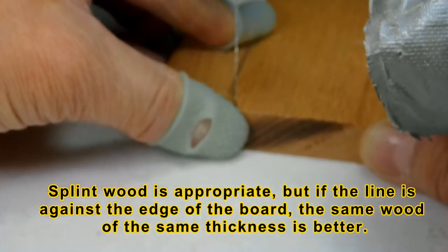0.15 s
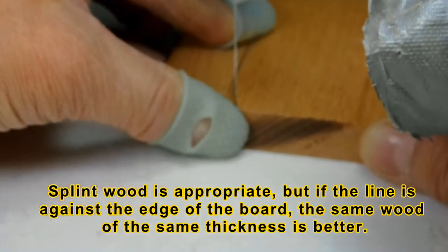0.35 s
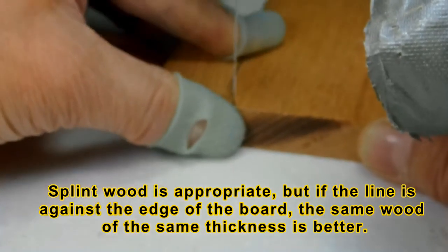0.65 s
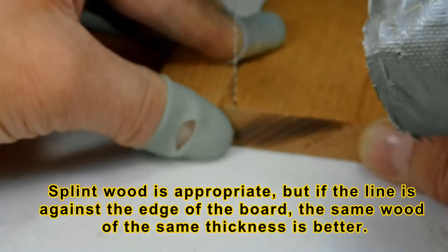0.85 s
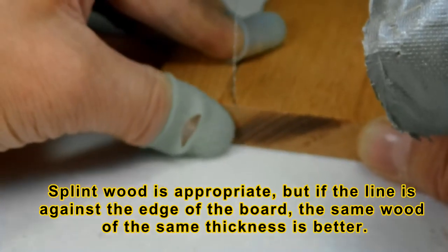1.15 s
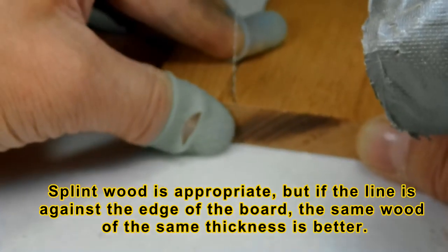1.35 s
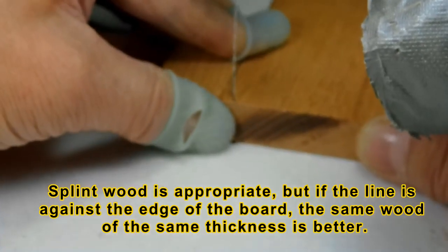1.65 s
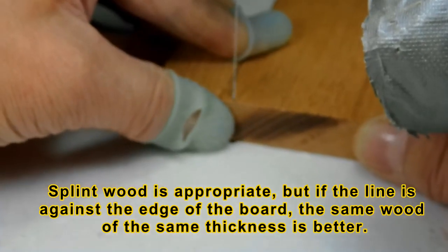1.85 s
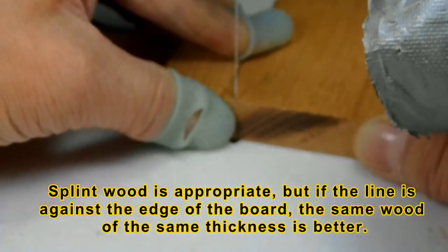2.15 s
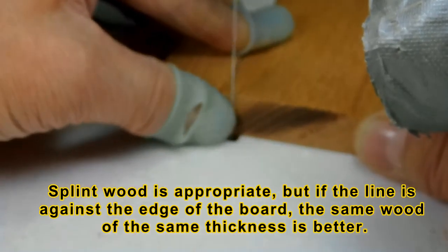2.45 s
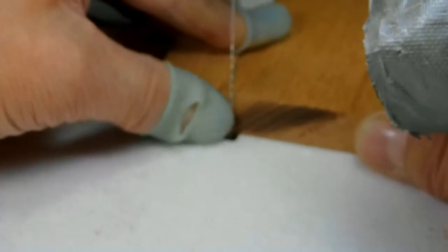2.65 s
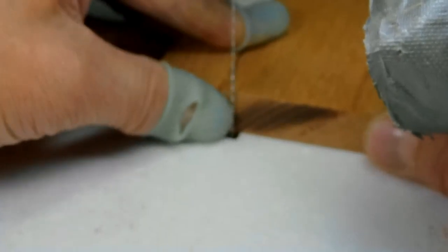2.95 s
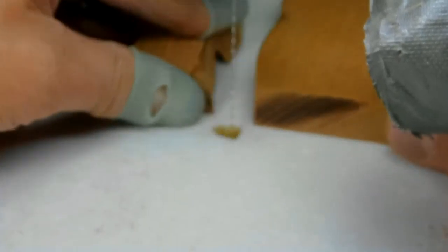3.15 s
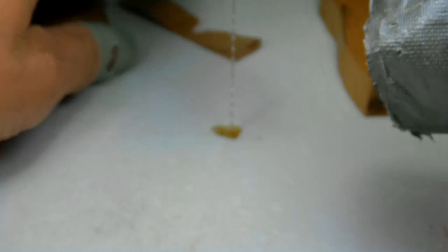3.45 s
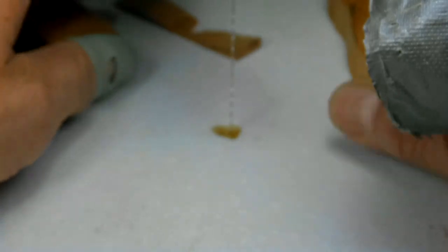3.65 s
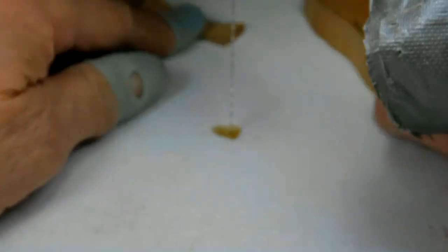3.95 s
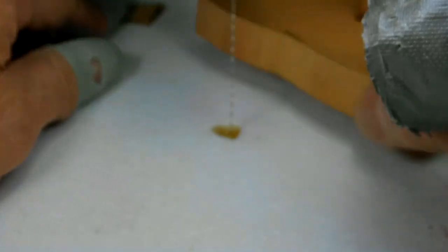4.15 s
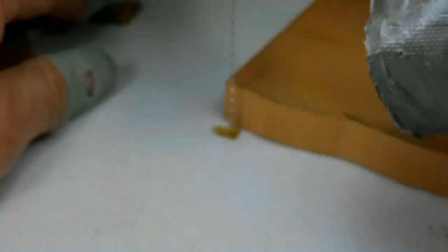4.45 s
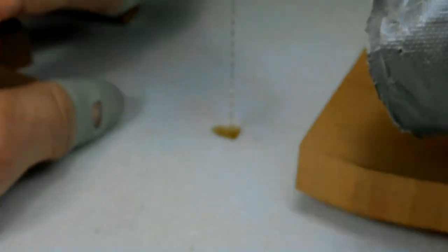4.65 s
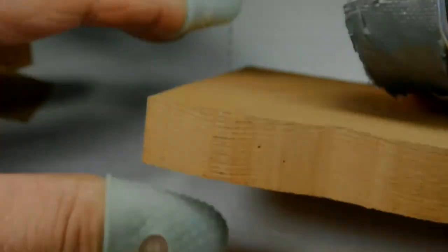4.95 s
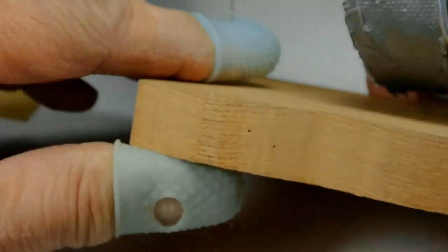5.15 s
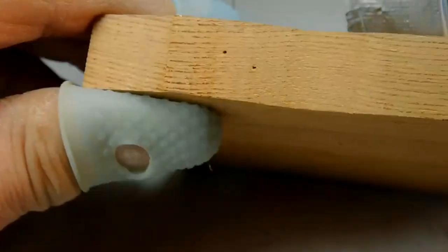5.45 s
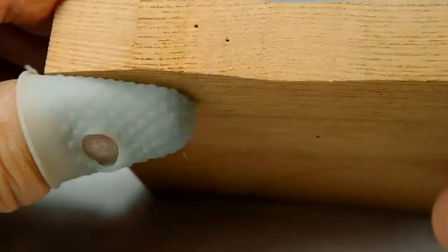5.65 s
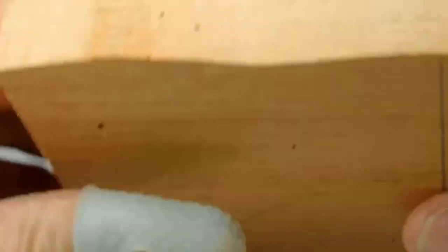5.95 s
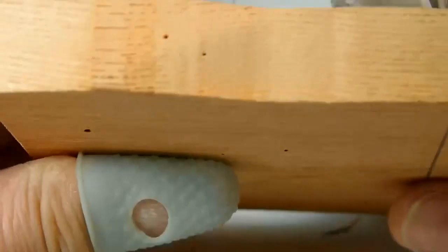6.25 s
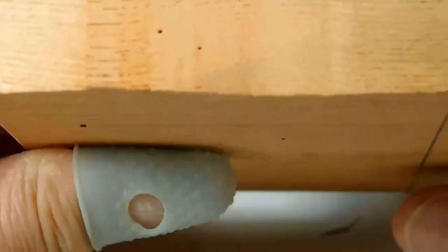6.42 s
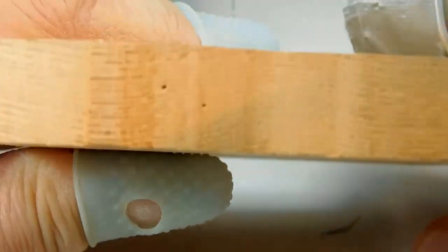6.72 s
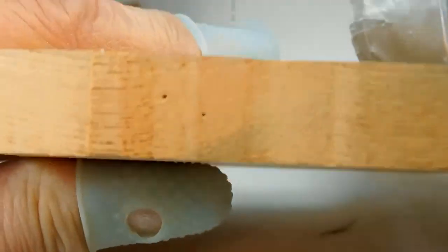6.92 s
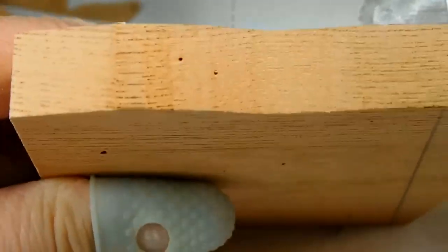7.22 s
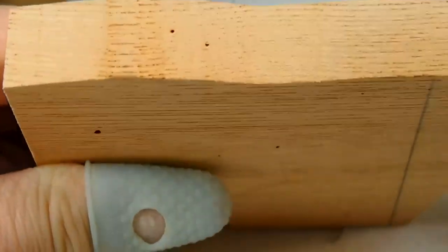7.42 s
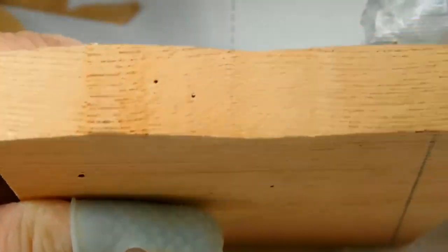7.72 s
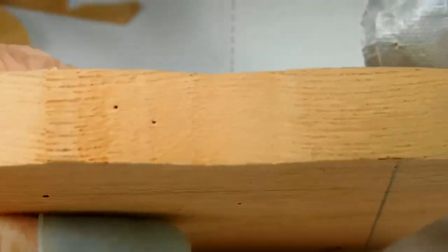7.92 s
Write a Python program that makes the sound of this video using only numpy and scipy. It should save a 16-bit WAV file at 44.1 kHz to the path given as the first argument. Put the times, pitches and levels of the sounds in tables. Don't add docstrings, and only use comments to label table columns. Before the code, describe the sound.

From 0 to about 2.4 seconds a scroll saw cuts a wooden board at roughly twenty strokes a second: a fluttering, grainy rasp, hard metallic knocks at each reversal, a buzzing blade tone and low frame hum. The knocks rattle more from 0.4 to 0.8; the rasp eases near 1.2, then returns. Around 2.5 the blade breaks out with a short buzzing surge, runs free, and fades to a stop by 3.2. Throughout, a dust extractor roars with a steady whine near 470 hertz and strong hiss. As the board leaves, near 3 to 3.5, the suction opens into a fuller rush. Alone until 8 seconds, it swells and changes colour as wood or hands pass the nozzle, briefly at 3.8 and 4.3, closely near 5, longer from 6 to 7, and again at 7.8. Close stereo pickup, small dry workshop, louder right.

```python
import sys
import numpy as np
from scipy import signal
from scipy.fft import rfft, irfft
from scipy.io import wavfile
from scipy.ndimage import uniform_filter1d

SR = 44100
rng = np.random.default_rng(int(sys.argv[2]) if len(sys.argv) > 2 else 0)


def int16_out(signal):
    q = np.round(np.clip(np.atleast_2d(signal).T, -1, 1) * 32767)
    wavfile.write(sys.argv[1], SR, q.astype(np.int16))


def voltage_ratio(level):
    return 10 ** (np.asarray(level, float) / 20)


N = 356328
TIME_S = np.arange(N) / SR
HZ = np.fft.rfftfreq(N, 1 / SR) + 1e-3
PART_S, APART_S = 2.95, 3.48


def rms_one(x):
    return x / np.sqrt(np.mean(x ** 2) + 1e-20)


def in_time(rows):
    s, *columns = np.transpose(rows)
    return [np.interp(TIME_S, s, column) for column in columns]


def over_hz(points):
    hz, db = np.transpose(points)
    return np.interp(np.log(HZ), np.log(hz), db)


def ramp(start_s, end_s):
    return np.clip((TIME_S - start_s) / (end_s - start_s), 0, 1)


def rings(modes):
    power = 0
    for hz, width_hz, db in modes:
        detuning = 2 * (HZ - hz) / width_hz
        power = power + voltage_ratio(db) ** 2 / (1 + 0.85 * detuning ** 2) ** 2
    return np.sqrt(power)


def drift(rate_hz):
    r = np.exp(-80 * np.pi * rate_hz / SR)
    slow = signal.lfilter([1], [1, -2 * r, r * r], rng.standard_normal(N // 40 + 2002))[2000:]
    return np.interp(np.arange(N) / 40, np.arange(len(slow)), rms_one(slow))


def turbulence(shape):
    # hz, level_db
    diffuse = [(60, -17), (250, -14.5), (900, -9.5), (2000, -4), (3500, -5.5), (6000, 0), (9000, -9.5),
               (14000, 12)]
    direct, *scattered = rfft(rng.standard_normal((3, N)))
    smooth = np.sqrt(uniform_filter1d(shape ** 2 / HZ, size=1501) * HZ + 1e-20)
    return rms_one(irfft(shape * direct + voltage_ratio(over_hz(diffuse)) * smooth * scattered, N))


def hose_roar():
    # hz, level_db (per Hz)
    flow = [(12, -70), (20, -66), (86, -27), (292, -11), (347, -7), (413, -7.5), (443, -11.5), (466, -5.5),
            (526, -6.5), (564, -7.5), (931, -3.5), (1030, -36), (1250, -20), (1620, -42), (2750, -120)]
    # hz, width_hz, level_db
    hose_modes = [(343, 15, -8), (774, 59, -4), (937, 51, -0.5), (1064, 85, -8), (1186, 87, -8.5),
                  (3466, 554, -7)]
    return voltage_ratio(-42.5) * turbulence(np.hypot(voltage_ratio(over_hz(flow)), voltage_ratio(4.0) * rings(hose_modes)))


def motor_whine():
    # start_s, pitch_hz, level_db
    rotor = [(0.0, 469.9, -43.5), (8.08, 471.9, -46)]
    hz, whine_db = in_time(rotor)
    phase = 2 * np.pi * np.cumsum(hz + 0.38 * drift(7.5)) / SR
    return np.sqrt(2) * voltage_ratio(whine_db + .5 * drift(3.4)) * np.sin(phase)


def passes():
    # start_s, length_s, gap_db, shade_db
    near_passes = [
        (2.21, 1.05, 6, 5),
        (3.745, 0.25, 2.5, -5),
        (4.25, 0.28, 2, -3.5),
        (4.845, 0.49, 6.5, 0.5),
        (6.05, 1.08, 4, -0.5),
        (7.75, 0.18, 3, 1),
    ]
    come_s, go_s = .2, .07
    gap_db, shade_db = np.zeros((2, N))
    for start_s, length_s, gain_db, loss_db in near_passes:
        leave_s = start_s + max(length_s, come_s)
        near = ramp(start_s, start_s + come_s) - ramp(leave_s, leave_s + go_s)
        gap_db += gain_db * near
        shade_db += loss_db * near
    return gap_db, shade_db


def hose_resonance(shade_db):
    # hz, width_hz, level_db
    pipe_modes = [(1305, 38, -8), (1412, 45, -3), (1496, 110, -10)]
    return voltage_ratio(-49 + 4 * ramp(5.27, 5.34) - shade_db) * turbulence(rings(pipe_modes))


def board_slot():
    return voltage_ratio(-47) * (1 - ramp(PART_S, APART_S)) * turbulence(rings([(3570, 420, 0)]))


def suction(level_db, gusts_db, modes):
    return voltage_ratio(level_db + gusts_db + 0.64 * drift(32)) * turbulence(rings(modes))


def nozzle_mouth(open_db, gusts_db):
    # hz, width_hz, level_db
    mouth_modes = [(1720, 153, 0.5), (1870, 180, -1), (2024, 450, 1.5), (2293, 133, -2.5)]
    return suction(-35 + open_db, gusts_db, mouth_modes)


def nozzle_gap(open_db, gap_db, gusts_db):
    # hz, width_hz, level_db
    gap_modes = [(2757, 116, 3), (3002, 270, 8.5), (3460, 340, 0)]
    return suction(-42.5 + 0.46 * open_db + gap_db, gusts_db, gap_modes)


def kerf_hiss(open_db, gusts_db):
    # hz, width_hz, level_db
    hiss_modes = [(4580, 560, 1), (5260, 230, -0.5), (5940, 2500, -5), (7430, 730, -2.5), (8280, 73, 1)]
    kerf_db = (10.5 + 1.83 * open_db) * (1 - ramp(PART_S, APART_S))
    return suction(-45 + kerf_db, .5 * gusts_db, hiss_modes)


def air_hiss(open_db, gusts_db):
    # hz, width_hz, level_db
    air_modes = [(9170, 1140, 3.5), (10500, 750, 0), (11820, 790, -8.5), (12800, 500, -11),
                 (14130, 1000, -22.5)]
    shadow_db = 2.5 * (1 - ramp(2.7, APART_S))
    return suction(-42.5 + 0.68 * open_db - shadow_db, .3 * gusts_db, air_modes)


def board_echo(x, share, paths_m):
    n = np.arange(N)
    late = [np.interp(n - path_m / 343 * SR, n, side) for side, path_m in zip(x, paths_m)]
    return (x + share * np.array(late)) / np.sqrt(1 + share ** 2)


def extractor():
    # start_s, opening_db, left_path_m, right_path_m
    nozzle = [(0, -8.5, 0.067, 0.058), (.6, -8, 0.11, 0.056), (1.8, -6, 0.1, .05), (2.4, -5, 0.048, 0.046),
              (3.12, -3, 0.043, 0.045), (3.27, 0, 0.082, 0.02), (3.6, -2, .09, 0.044),
              (3.95, -0.2, 0.079, 0.033), (4.3, -1.5, .086, 0.049), (4.55, -.5, 0.098, 0.048),
              (4.9, -0.5, 0.081, 0.032), (5.05, -3, 0.098, 0.093), (5.4, -2.1, .1, 0.12),
              (5.6, -2.5, 0.09, 0.14), (6.1, -3.5, 0.068, 0.094), (6.9, -3, 0.076, 0.092),
              (7.6, -3.8, 0.08, 0.1), (8.08, -2.5, 0.056, 0.082)]
    open_db, *paths_m = in_time(nozzle)
    gap_db, shade_db = passes()
    gusts_db = .55 * drift(40)
    steady = motor_whine() + hose_roar() + hose_resonance(shade_db) + board_slot()
    low = nozzle_mouth(open_db, gusts_db) + nozzle_gap(open_db, gap_db, gusts_db)
    high = kerf_hiss(open_db, gusts_db) + air_hiss(open_db, gusts_db)
    return steady + low + board_echo(high, .36, paths_m + .003 * drift(3))


def frame_shake(stroke, level_db, cutting):
    # multiple of the stroke rate, level_db
    harmonics = [(1, -8), (3, 0.7), (4, -8.5), (6, -17)]
    hum = sum(voltage_ratio(db) * np.cos(2 * np.pi * k * stroke) for k, db in harmonics)
    free = voltage_ratio(-68) * (1 - cutting) * np.cos(2 * np.pi * 6 * stroke)
    return np.sqrt(2) * voltage_ratio(level_db) * hum + free


def singing(stroke, level_db):
    # multiple of the stroke rate, level_db
    tooth_partials = [(11, -14), (15, -10), (16, -9), (17, -10), (20, -7), (21, 2), (22, -4), (29, -8),
                      (35, -12), (38, -12)]
    song = 0
    for k, db in tooth_partials:
        song = song + voltage_ratio(db + 1.5 * drift(3)) * np.cos(2 * np.pi * (k * stroke + rng.random()))
    return np.sqrt(2) * voltage_ratio(level_db) * song


def knocks(stroke, level_db):
    # share of the stroke, level_db
    reversals = [
        (.34, -1.5),
        (.84, 0),
    ]
    # pitch_hz, level_db, t60_s, upper_reversal_db, gain_db_per_s as the cut advances
    arm_modes = [(1450, -3.5, .028, -10, 1.5), (1555, 1, .024, 0, -1.5), (2120, -7, .016, -2, 0),
                 (6400, -15, .003, 0, 0), (8600, -17, .003, 0, 0)]
    play = .005 * drift(30)
    hits, slack = [], 0
    for at, db in reversals:
        turns = np.maximum.accumulate(np.floor(stroke + play - at))
        hits.append((np.flatnonzero(np.diff(turns)), db))
        distance = (stroke - at + .5) % 1 - .5
        slack = slack + voltage_ratio(db) * np.exp(-.5 * (distance / .03) ** 2)
    rattle = .018 * slack * rng.standard_normal(N) + 1e-18
    out = 0
    for hz, mode_db, t60_s, upper_db, gain_db in arm_modes:
        blows = rattle.copy()
        for (at, db), extra_db in zip(hits, [upper_db, 0]):
            blows[at] += voltage_ratio(db + extra_db + 1.4 * rng.standard_normal(80))[:len(at)]
        r, w = voltage_ratio(-60 / (t60_s * SR)), 2 * np.pi * hz / SR
        swell = signal.lfilter([np.sin(w)], [1, -2 * r ** 2 * np.cos(w), r ** 4], blows)
        ring = signal.lfilter([np.sin(w)], [1, -2 * r * np.cos(w), r * r], swell)
        out = out + voltage_ratio(mode_db + gain_db * TIME_S) * rms_one(ring)
    return voltage_ratio(level_db + 4.0) * rms_one(out)


def rasp(stroke, level_db):
    # hz, level_db (per Hz)
    board_spectrum = [(60, -41), (150, -29), (215, -12.5), (310, -9.5), (380, -14), (520, -10),
                      (770, -11.5), (1100, -13), (1400, -21), (2000, -28.5)]
    # hz, width_hz, level_db
    board_modes = [(427, 30, 9), (760, 130, 4)]
    teeth = rms_one(irfft(np.exp(2j * np.pi * rng.random((2, 1025))), 2048))
    place = stroke % 1 * 2048
    first, second = (np.interp(place, np.arange(2048), row, period=2048) for row in teeth)
    wear = 0.097 * stroke
    pattern = np.cos(wear) * first + np.sin(wear) * second
    bite = voltage_ratio(3.2 * np.cos(2 * np.pi * (stroke - .97)))
    scrape = bite * (0.67 * pattern + 0.68 * rng.standard_normal(N))
    board = voltage_ratio(over_hz(board_spectrum)) * np.hypot(1, rings(board_modes))
    return voltage_ratio(level_db + 2.0) * rms_one(irfft(rfft(scrape) * board, N))


def saw():
    # start_s, rate_hz
    crank_speed = [
        (0, 20.3),
        (.65, 20.6),
        (1.27, 20.0),
        (1.85, 20.32),
        (2.2, 19.93),
        (2.6, 21.3),
        (2.9, 20.0),
        (3.3, 0),
    ]
    # start_s, feed_db
    hand_feed = [(0, -0.5), (.22, -0.5), (.45, -1), (1.18, -5), (1.45, -0.5), (1.8, -0.5), (2.05, 1),
                 (2.38, 1), (2.5, 4.5), (2.6, -3.5)]
    t = TIME_S
    since_s, rate_hz = np.transpose(crank_speed)
    steps_hz = rate_hz[np.searchsorted(since_s, t, side="right") - 1]
    speed_hz = uniform_filter1d(steps_hz, size=6000, mode="nearest")
    stroke = -.12 + np.cumsum(speed_hz) / SR
    feed_db, = in_time(hand_feed)
    breakout = np.exp(-.5 * ((t - 2.5) / .055) ** 2)
    chatter = ramp(.33, .391) - ramp(.8, .832)
    rasp_db = -44.5 + feed_db - 55 * np.maximum(t - 2.8, 0)
    knock_db = -49.5 + 0.28 * feed_db - 1.6 * t + 4 * chatter
    song_db = -44 + feed_db - 4.8 * t + 11.5 * breakout
    hum_db = -60.3 - 1.1 * t + 7 * breakout - 95 * np.maximum(t - 2.96, 0)
    cutting, running = 1 - ramp(2.41, 2.58), 1 - ramp(2.9, 3.2)
    at_work = knocks(stroke, knock_db) + singing(stroke, song_db)
    turning = rasp(stroke, rasp_db) + frame_shake(stroke, hum_db, cutting)
    return cutting * at_work + running * turning


def scene():
    # hz, left_minus_right_db
    side_lean = [(60, -3), (110, -5.5), (200, -5.5), (380, -5.0), (690, -5.0), (1280, -6), (2350, -9),
                 (4340, -10), (8000, -4.5), (14700, -7.5)]
    left_lag_s, shop_t60_s, shop_db = .000028, 0.048, -9.5
    tail = rng.standard_normal((2, SR // 2)) * voltage_ratio(-60 * np.arange(SR // 2) / SR / shop_t60_s)
    tail /= np.sqrt(np.sum(tail ** 2, axis=1, keepdims=True))
    shop = 1 + voltage_ratio(shop_db) * rfft(tail, N) / np.hypot(1, 900 / HZ)
    lean = voltage_ratio(over_hz(side_lean) / 2 * [[1], [-1]])
    lag = np.exp(-2j * np.pi * HZ * left_lag_s * [[1], [0]])
    return irfft(rfft(extractor() + saw()) * shop * lean * lag, N)


def band_limit(x):
    return signal.sosfilt(signal.butter(12, 15340, fs=SR, output="sos"), x)


def record(dry):
    return band_limit(dry)


dry = scene()
out = record(dry)
int16_out(out)
```